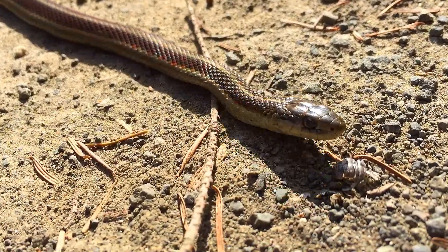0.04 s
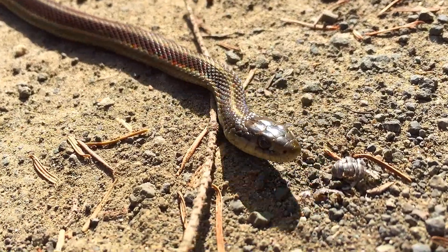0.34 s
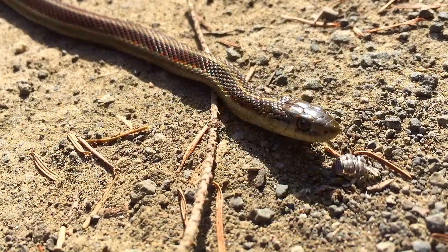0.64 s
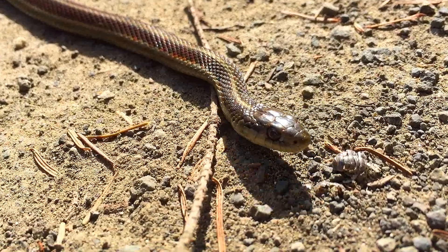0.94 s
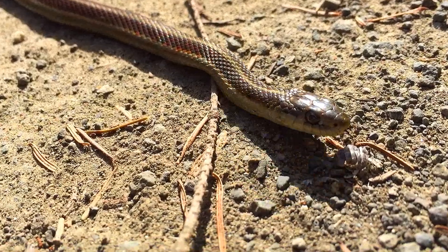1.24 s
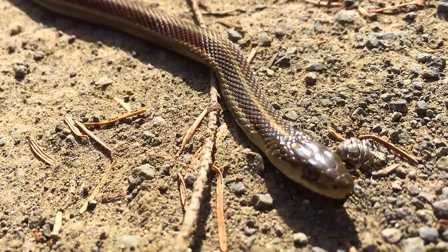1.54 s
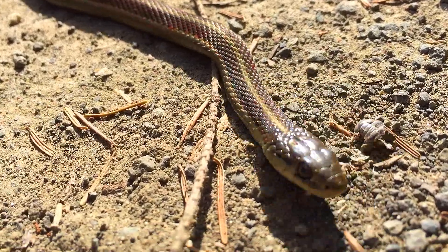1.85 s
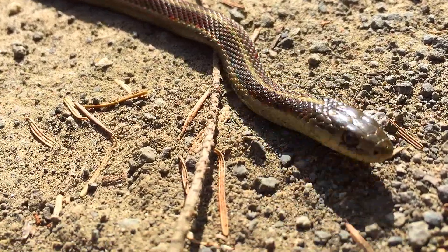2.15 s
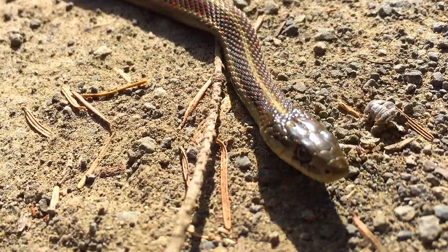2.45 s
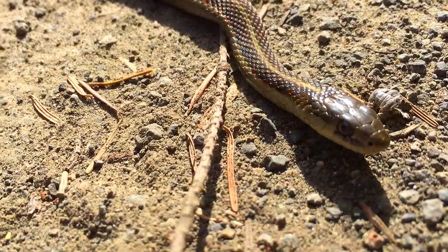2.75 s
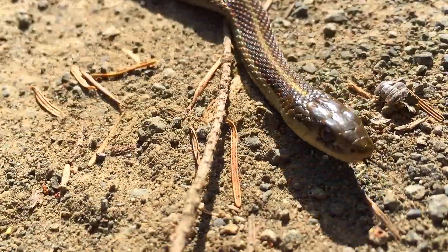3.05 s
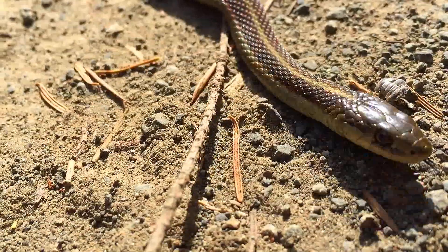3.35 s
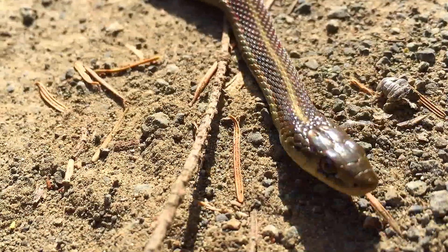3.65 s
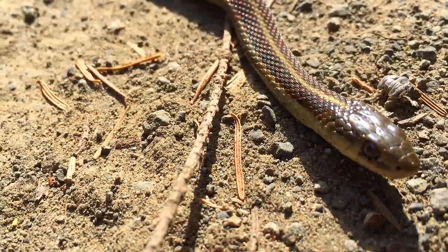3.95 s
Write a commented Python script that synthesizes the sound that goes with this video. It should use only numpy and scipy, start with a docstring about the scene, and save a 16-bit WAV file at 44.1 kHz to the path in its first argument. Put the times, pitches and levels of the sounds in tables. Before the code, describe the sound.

Close rubbing and clicking on the microphone stands out against quiet outdoor air. At first there is only a faint wash. From about 1.5 seconds a breeze buffets the microphone in soft, low thumps, over a barely audible hiss of snake scales on sand. A light swish with dry clicks comes at 2.4 seconds, then a gritty scrape from 2.8 to 3.3. The wind thumps hardest around 3.4.

```python
"""A quiet day outdoors, with a camera held just above a snake on sandy gravel.
Two tiny chirps peek out of a faint wash of air, then the snake's scales start to hiss on the sand.
After a second and a half a breeze buffets the microphone in low, soft thumps.
From about 2.4 s something rubs close by, probably a finger shifting on the casing: first a light
swish, then a gritty scrape, with dry clicks as it sticks and slips."""
import sys
import numpy as np
from scipy import signal
from scipy.fft import rfft, irfft
from scipy.io import wavfile
from scipy.ndimage import uniform_filter1d

SR = 44100
rng = np.random.default_rng(int(sys.argv[2]) if len(sys.argv) > 2 else 0)


def master_out(mix):
    """Clip the mix to full scale and print it as 16-bit PCM to the path in sys.argv[1]."""
    frames = np.transpose(np.atleast_2d(mix))
    ceiling = np.clip(frames, -1, 1)
    pcm = np.round(ceiling * 32767).astype(np.int16)
    wavfile.write(sys.argv[1], SR, pcm)


N = 176400  # 4 seconds
TIME_S = np.arange(N) / SR


def amp(db):
    """Turns decibels into a number to multiply a sound by."""
    return 10 ** (np.asarray(db) / 20)


def unit(x):
    """Scales a signal so that its average strength (rms) is 1."""
    return x / np.sqrt(np.mean(x ** 2) + 1e-20)


def read(points, hz):
    """Looks up the decibels at a pitch, between rows of pitch_hz, level_db."""
    pitch_hz, level_db = np.transpose(points)
    return np.interp(np.log(hz + 1), np.log(pitch_hz + 1), level_db)


def level(rows, column=1):
    """Volume over time from one decibel column of a table; silent before and after it."""
    rows = np.array(rows)
    return amp(np.interp(TIME_S, rows[:, 0], rows[:, column], left=-140, right=-140))


def add(mix, start_s, sound):
    """Mixes a sound in at its start time."""
    part = mix[max(round(start_s * SR), 0):][:len(sound)]
    part += sound[:len(part)]


def response(db_at, size=2048):
    """How an object rings after one tap, given its decibels at each pitch."""
    log_gain = np.log(amp(db_at(abs(np.fft.fftfreq(size, 1 / SR)))))
    return np.fft.ifft(np.exp(np.conj(signal.hilbert(log_gain)))).real


def shake(force, ring):
    """Shakes an object: every push of the force starts a copy of its ring."""
    return signal.oaconvolve(force, ring / np.linalg.norm(ring))[:N]


def noise(colour):
    """Steady noise whose colour says how strong each pitch is."""
    gain = amp(read(colour, np.fft.rfftfreq(N, 1 / SR)))
    return unit(irfft(rfft(rng.standard_normal(N)) * gain, N))


def band(hz, width_hz):
    """Noise around one pitch; around 0 Hz it is a slow wobble."""
    bell = np.exp(-.5 * ((np.fft.rfftfreq(N, 1 / SR) - hz) / width_hz) ** 2)
    return unit(irfft(rfft(rng.standard_normal(N)) * bell, N))


def air(level_db=-64, drift_db=1.5):
    """A faint, distant outdoor wash that drifts in soft patches of time and pitch."""
    # colour of the wash: pitch_hz, level_db
    colour = [(25, -6.5), (48, -17.5), (80, -6.5), (125, -12.5), (600, -14), (1000, -15), (1350, -22),
              (2900, -30.5), (4260, -31.5), (15000, -40)]
    grid = signal.stft(noise(colour), nperseg=1024, noverlap=768)[2]
    patches = uniform_filter1d(rng.standard_normal(grid.shape), 16, axis=1)  # smooth over time
    patches = uniform_filter1d(patches, 7, axis=0)  # and over pitch
    wash = signal.istft(grid * amp(drift_db * unit(patches)), nperseg=1024, noverlap=768)[1][:N]
    return amp(level_db) * unit(wash)


def chirps():
    """Two tiny chirps of high noise, barely above the wash."""
    # the chirps: middle_s, half_length_s, peak_db
    peeps = [(.149, 0.0067, -74.5), (.165, 0.0096, -74)]
    volume = sum(amp(db) * np.exp(-((TIME_S - s) / half_s) ** 2) for s, half_s, db in peeps)
    return volume * band(3150, width_hz=330)


def wind(wander_share=.11):
    """The breeze rumbles, and each small swirl of air shakes the microphone for a moment."""
    # strength of the breeze: time_s, level_db
    breeze = [(0, -88), (1.5, -72), (1.58, -47), (1.67, -57), (1.73, -47), (1.86, -51.5), (1.96, -39.5),
              (2.07, -49.5), (2.22, -43), (2.41, -44.5), (2.48, -56.5), (2.9, -54), (3.27, -51.5),
              (3.38, -28.5), (3.52, -50.5), (3.68, -36.5), (3.77, -50), (4, -46)]
    # colour of its rumble: pitch_hz, level_db
    colour = [(15, -18), (30, -7.5), (55, 7), (90, -5), (130, -3), (190, -16.5), (260, -25.5), (350, -57),
              (600, -63), (1500, -99)]
    # single swirls: middle_s, half_length_s, peak_db, pitch_hz, flutter_db (compared with the swirl)
    swirls = [(0.204, 0.025, -49, 77.6, -36), (0.738, 0.094, -59.5, 66, -27),
              (1.393, 0.035, -55.5, 88, -26), (1.616, 0.022, -36, 60, -42), (1.711, 0.012, -38.5, 80, -19),
              (1.738, 0.017, -41, 140, -19), (1.818, 0.013, -35.5, 77.2, -40),
              (1.907, 0.014, -22, 102, -24), (1.933, 0.015, -29.5, 54, -21.5),
              (1.983, 0.0097, -30.5, 82, -23), (2.217, 0.044, -42.5, 112.3, -16.5),
              (2.284, 0.0094, -34, 67.6, -36), (2.395, 0.033, -29, 88.2, -17),
              (2.634, 0.018, -39, 78.7, -41), (2.811, 0.011, -36.5, 97.7, -40),
              (2.973, 0.027, -33.5, 100.7, -22.5), (3.095, 0.017, -38, 75.8, -17),
              (3.189, 0.02, -37.5, 126, -16), (3.221, 0.015, -26, 58, -29), (3.359, 0.018, -26, 105, -15.5),
              (3.378, 0.0047, -20, 135, -34), (3.391, 0.011, -32, 240, -12), (3.383, 0.0066, -43, 400, -13),
              (3.411, 0.07, -32, 74.8, -48), (3.595, 0.018, -31.5, 125, -12), (3.607, 0.019, -28, 52, -43),
              (3.698, 0.036, -32, 61.63, -23.5), (3.966, 0.025, -42, 85, -7.5)]
    rumble = noise(colour)
    lumps = np.sqrt(uniform_filter1d(rumble ** 2, size=1500) + 1e-6)
    even_rumble = unit(rumble / lumps)
    out = even_rumble * amp(np.interp(TIME_S, *np.transpose(breeze)))
    wander, flutter = band(0, width_hz=34.8), band(192.7, width_hz=69.6)
    uneven_time = np.cumsum(1 + wander_share * wander) / SR  # makes each swirl's pitch waver
    for middle_s, half_s, db, hz, flutter_db in swirls:
        near = abs(TIME_S - middle_s) < 4 * half_s
        swirl = np.sin(2 * np.pi * (hz * uneven_time[near] + rng.random()))
        swell = amp(db) * np.exp(-((TIME_S[near] - middle_s) / half_s) ** 2)
        out[near] += swell * (swirl + amp(flutter_db) * flutter[near])
    return out


def scales_on_sand(flicker_db=3.5):
    """The snake's scales hiss faintly on the dry ground."""
    # strength of the rustle: time_s, level_db
    rustle = [(1.35, -84), (1.7, -79), (2.1, -83), (2.35, -80), (4, -79)]
    # colour of the sand's hiss: pitch_hz, level_db
    colour = [(500, -35), (2500, 6.5), (4000, 6.5), (5000, 0.5), (15500, 0)]
    flicker = amp(flicker_db * band(0, width_hz=38))
    return level(rustle) * flicker * noise(colour)


def swish():
    """A soft, hoarse swish under the rubbing: smooth noise gathered around a few pitches."""
    # strength of the swish: time_s, lower_db, upper_db
    strength = [(2.34, -90, -101), (2.39, -63, -75), (2.46, -57.5, -69), (2.51, -59, -63),
                (2.6, -58.5, -58), (2.64, -56.5, -59), (2.665, -65, -81), (2.8, -80, -97),
                (2.825, -68, -53), (2.86, -59.5, -83), (2.94, -56.5, -52.5), (3.12, -64, -74),
                (3.3, -82, -97)]
    # its lower resonances (pitches that ring easily): pitch_hz, width_hz, level_db
    resonances = [(1063, 56, -10.5), (1297, 130, -6.5), (1440, 36, -8), (1560, 280, -6)]
    lower = unit(sum(amp(db) * band(hz, width / 2) for hz, width, db in resonances))
    upper = band(2000, width_hz=175)
    return level(strength, column=1) * lower + level(strength, column=2) * upper


def tiny_slips(slips_per_s=2600, spread_db=9, smooth_share=.29, judder_hz=108):
    """The force of rubbing: countless slips of uneven size, bunched up as the contact judders."""
    # the judder, deepest at the height of the scrape: time_s, depth_db
    depths = [(2.86, 2.4), (2.92, 3.4), (2.95, 6.3), (3.01, 2.6), (3.05, 1.6)]
    sizes = amp(spread_db * np.minimum(rng.exponential(1, N), 3)) * rng.choice([-1, 1], N)
    slips = unit(sizes * (rng.random(N) < slips_per_s / SR))
    turns = np.cumsum(judder_hz * (1 + .212 * band(0, width_hz=25.56))) / SR  # an unsteady beat
    judder = amp(np.interp(TIME_S, *np.transpose(depths)) * np.sin(2 * np.pi * turns))
    smooth = rng.standard_normal(N)
    return judder * (np.sqrt(1 - smooth_share) * slips + np.sqrt(smooth_share) * smooth)


def rubbing():
    """Two strokes of tiny slips shake the casing, heard as a low body, a grit and a high fizz."""
    # force of the light stroke and the hard one: time_s, body_db, grit_db, fizz_db
    light = [(2.39, -67, -78, -90), (2.44, -53.5, -69, -61), (2.475, -75, -69, -82),
             (2.51, -55.5, -62.5, -66.5), (2.605, -64, -66, -69.5), (2.62, -51.5, -56, -57.5),
             (2.66, -73, -77, -77), (2.76, -97, -83, -103)]
    hard = [(2.812, -63, -64, -77), (2.823, -49, -65, -62), (2.855, -52.5, -56, -57.5),
            (2.885, -47, -53, -53), (2.92, -52, -53, -50.5), (2.94, -47.5, -60, -55), (2.98, -49, -50, -57),
            (3.03, -74, -72, -71), (3.08, -59.5, -58, -63.5), (3.125, -71, -61, -65.5),
            (3.19, -72, -73, -76.5), (3.28, -87, -71.5, -89)]
    # colours of the three parts: pitch_hz, level_db
    body_colour = [(60, -19), (150, -6), (250, -3.5), (370, -11), (550, -0.5), (800, -9.5), (1000, -13.5),
                   (1400, -21), (2500, -48), (16000, -70)]
    grit_colour = [(100, -32), (700, -35), (1300, -4), (4000, 7), (4900, -1.5), (5700, 6), (7000, -21),
                   (16000, -33)]
    fizz_colour = [(100, -60), (4000, -13), (6500, 3), (8800, 5), (10500, -2), (12800, -1), (15500, -2)]
    slips = tiny_slips()
    body, grit, fizz = [slips * (level(light, column) + level(hard, column)) for column in (1, 2, 3)]
    out = casing_tones(grit) + rasp(slips)
    for force, colour in [(linger(body), body_colour), (linger(grit), grit_colour), (fizz, fizz_colour)]:
        out += shake(force, response(lambda hz: read(colour, hz)))
    return out


def casing_tones(force, gain_db=-1.5):
    """Rubbing keeps the casing's own tones ringing; the narrower a tone, the longer it lasts."""
    # the casing's tones: pitch_hz, width_hz, level_db (compared with each other)
    tones = [(234, 27, 8), (490, 52, -7), (1430, 35, 8), (2066, 18, -8), (3010, 31, 4), (3630, 100, 4.5)]
    t = np.arange(4096) / SR
    ring = sum(amp(db) * unit(np.exp(-np.pi * width * t) * np.sin(2 * np.pi * hz * t))
               for hz, width, db in tones)
    return amp(gain_db) * shake(force, ring)


def linger(force, fade_s=.014, tail_db=1):
    """The casing keeps trembling for a moment after each tiny slip."""
    t = np.arange(4096) / SR
    tail = rng.standard_normal(len(t)) * np.exp(-t / fade_s)
    return shake(force, (t == 0) + amp(tail_db) * tail / np.linalg.norm(tail))


def smear(sound):
    """The casing smears each pulse into a very short falling chirp, high pitches first."""
    # where the casing holds the sound back: pitch_hz, width_hz
    delays = [(900, 840), (1400, 4800), (3800, 7200), (9000, 3100)]
    for hz, width in delays:
        fade = np.exp(-np.pi * width / SR)
        poles = [1, -2 * fade * np.cos(2 * np.pi * hz / SR), fade * fade]
        sound = signal.lfilter(poles[::-1], poles, sound)  # delays pitches but keeps their strength
    return sound


def resonate(sound, hz, width_hz):
    """Lets through the part of a sound near one pitch, which may glide."""
    turn = np.exp(2j * np.pi * np.cumsum(hz * np.ones(len(sound))) / SR)
    fade = np.exp(-np.pi * width_hz / SR)
    return 2 * (turn * signal.lfilter([1 - fade], [1, -fade], sound / turn)).real


def clicks(creep_s=.00099, release_s=.00018, crumble_s=.0028, lag_s=.000927):
    """The stuck contact creeps, lets go in a sharp burst and crumbles, briefly ringing the casing."""
    # the slips: start_s, thud_db, knock_db, snap_db, fizz_db, crumble_db (compared with the burst)
    slips = [(2.4303, -39, -39.5, -41.5, -45.5, -25), (2.4361, -35.5, -36, -42, -43.5, -8),
             (2.5028, -69, -62, -63, -57, -10), (2.5407, -52, -54, -63, -53, -9),
             (2.5437, -42, -49, -49.5, -41, -5), (2.6186, -51.5, -55, -50, -64, -6),
             (2.6351, -61, -50.5, -47.5, -58, -15), (2.8248, -50, -43, -50, -64, 3),
             (2.835, -56, -46.5, -46.5, -44.5, -21), (2.8475, -45, -51, -43, -46, -17),
             (2.8782, -56, -50, -49, -47, -7), (2.9158, -42.5, -44, -41.5, -53, -21),
             (2.9245, -49, -48, -39, -57, 13), (2.9408, -43, -52, -44, -61, -2),
             (2.9495, -51, -50, -47, -65, 4), (2.9855, -51, -58, -48, -59, -10),
             (3.0185, -57, -46, -53, -57, -22), (3.042, -63.5, -38, -54.5, -52, -1),
             (3.088, -74, -39, -47.5, -47, -15), (3.1015, -54, -48, -50, -45.5, -12),
             (3.1167, -59, -46, -50, -55.5, -12), (3.254, -71, -57.5, -61, -58, -10),
             (3.2634, -80, -64, -60, -57.5, -9), (3.9677, -54, -44, -63, -79, 2)]
    # where the thud, knock, snap and fizz lie: pitch_hz
    bands_hz = [560, 1300, 3400, 8000]
    # how the casing boosts a click: pitch_hz, gain_db
    casing = [(60, 1), (250, 41), (380, 26.5), (550, 40.5), (820, 32.5), (1400, 35.5), (2000, 26),
              (3400, 34), (4900, 28), (9000, 20), (13000, 14.5), (16000, 4)]
    # short tones that each click rings: pitch_hz, width_hz, level_db (compared with the direct sound)
    knocks = [(570, 110, -12), (1153, 57, -9.5), (2095, 97, -10), (2775, 82, -11)]
    out, t = np.zeros(N), np.arange(-256, 1024) / SR  # the contact lets go at t = 0
    for start_s, *bands_db, crumble_db in slips:
        grit = rng.standard_normal(len(t))
        creep = unit(grit * (t < 0) * np.exp(-abs(t) / creep_s))
        spray = np.gradient(grit * (t > 0) * np.exp(-abs(t) / release_s))
        burst = unit(unit(t == 0) + unit(spray) / 4)
        crumble = unit(grit * (t > 0) * np.exp(-abs(t) / crumble_s))
        pulse = amp(-9) * creep + burst + amp(crumble_db) * crumble
        colour = list(zip(bands_hz, bands_db))
        direct = response(lambda hz: read(casing, hz) + read(colour, hz))
        detune = 1 + .04 * rng.uniform(-.79, 1)
        ring = direct + sum(amp(db) * resonate(direct, hz * detune, width) for hz, width, db in knocks)
        add(out, start_s + lag_s + t[0], signal.fftconvolve(pulse / np.linalg.norm(pulse), ring))
    return out


def rasp(slips, width_hz=490):
    """At the height of the scrape the slips ring at a pitch that shifts as the contact moves."""
    # path of the rasp: time_s, level_db, pitch_hz
    path = [(2.86, -75, 3830), (2.905, -65, 3660), (2.93, -54.5, 3150), (2.98, -61, 3150),
            (3.025, -70, 4080)]
    time_s, _, pitch_hz = np.transpose(path)
    glide_hz = np.interp(TIME_S, time_s, pitch_hz)
    ringing = resonate(slips, glide_hz, width_hz)
    return level(path) * unit(resonate(ringing, glide_hz, width_hz))  # twice, for a sharper pitch


def scene():
    """All the sounds together in one channel, with no echo."""
    mix = air() + wind() + chirps() + scales_on_sand() + swish() + smear(rubbing() + clicks())
    return mix[None]


def record(dry, cutoff_hz=15350):
    """The camera cuts off the very highest pitches."""
    low_pass = signal.firwin(401, cutoff_hz, window=("kaiser", 8), fs=SR)
    return signal.oaconvolve(dry, low_pass[None], "same")


dry = scene()
out = record(dry)
master_out(out)
```